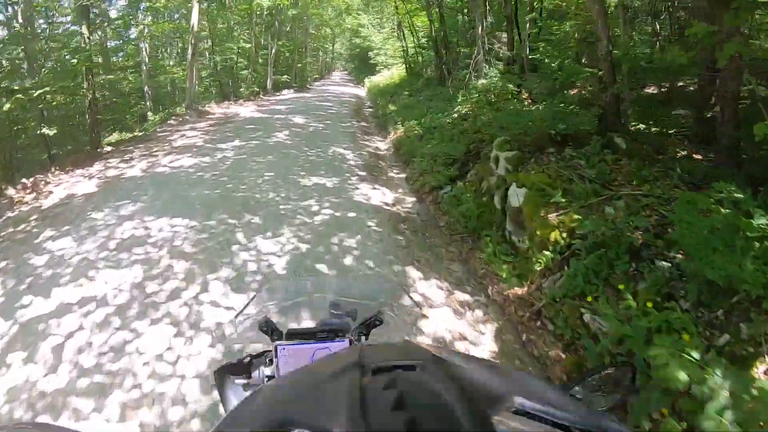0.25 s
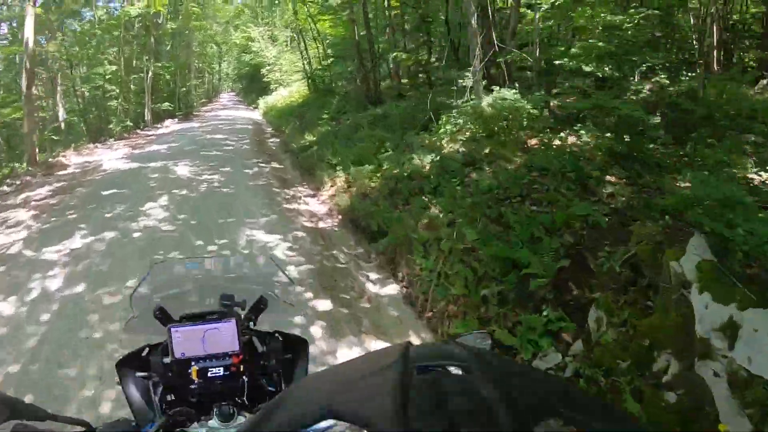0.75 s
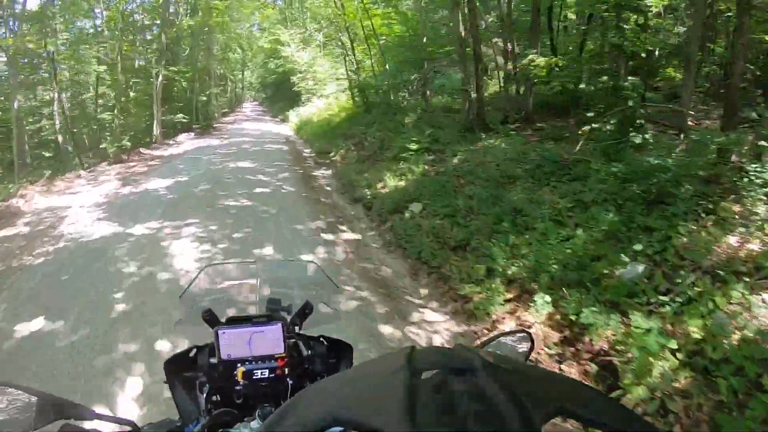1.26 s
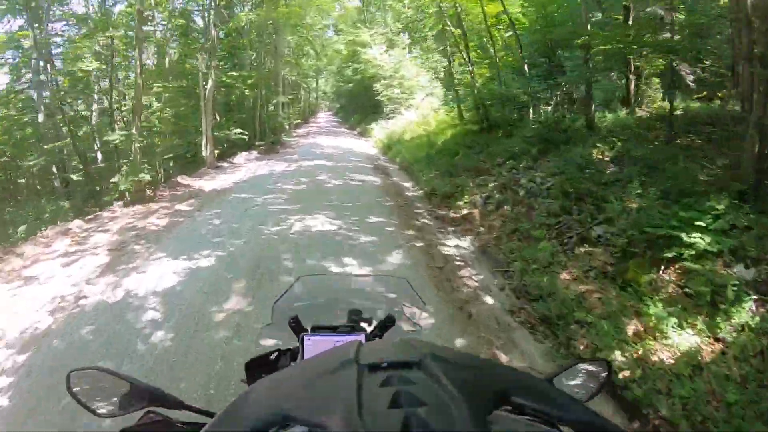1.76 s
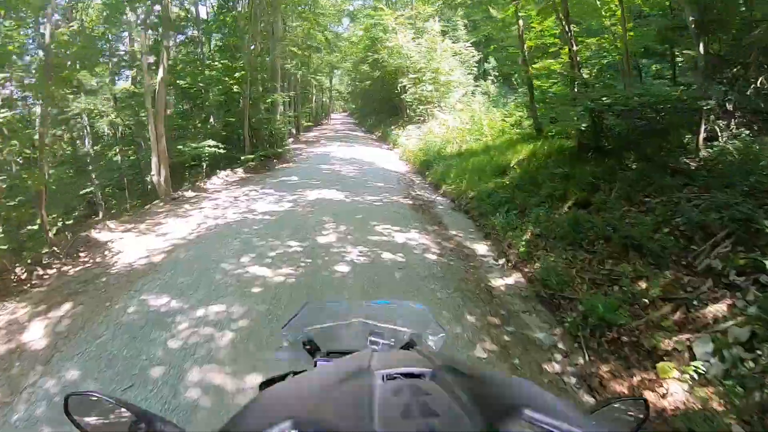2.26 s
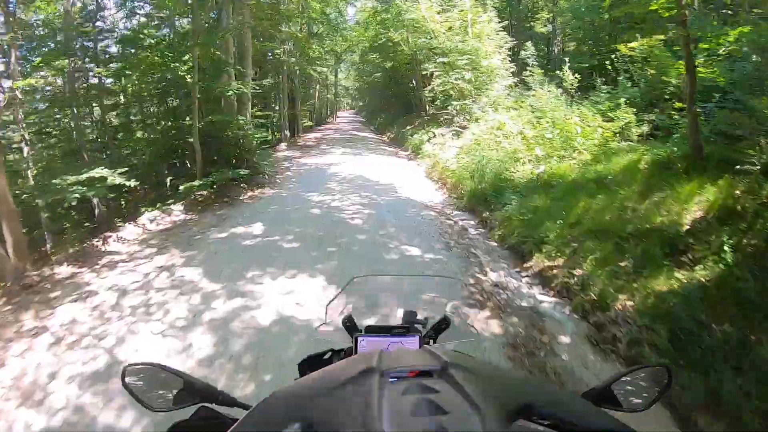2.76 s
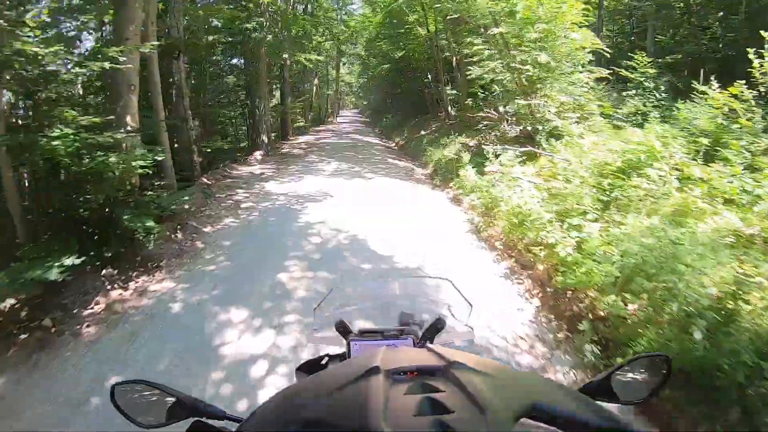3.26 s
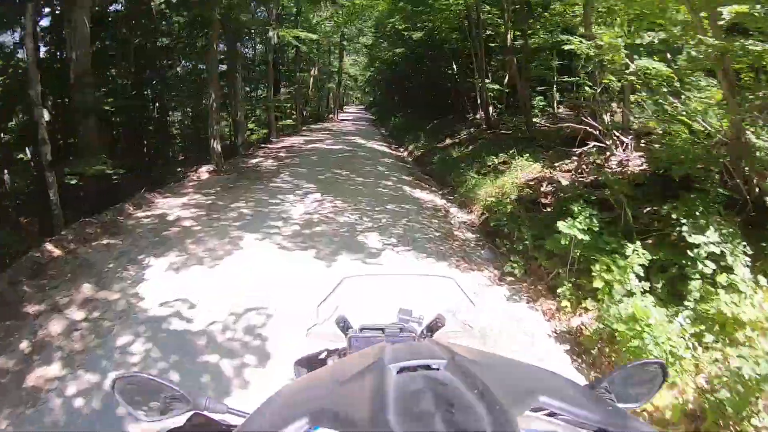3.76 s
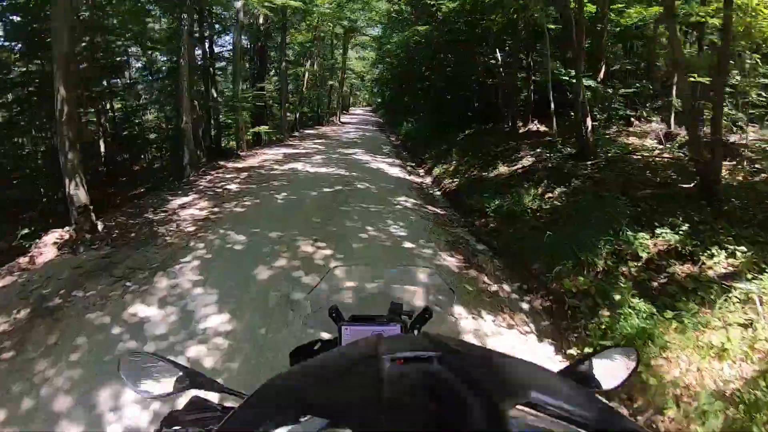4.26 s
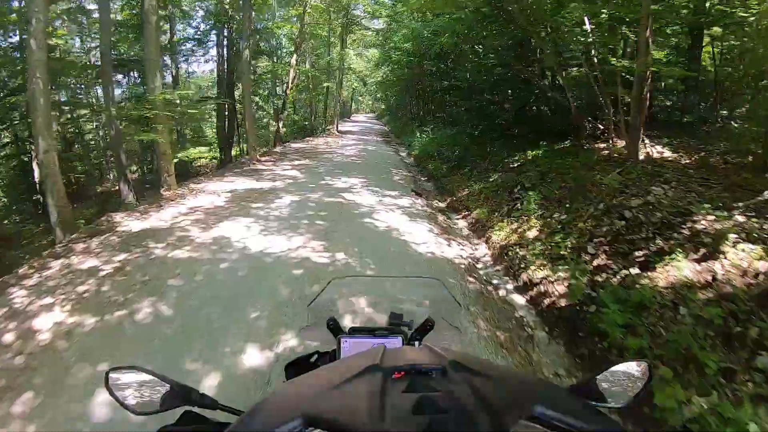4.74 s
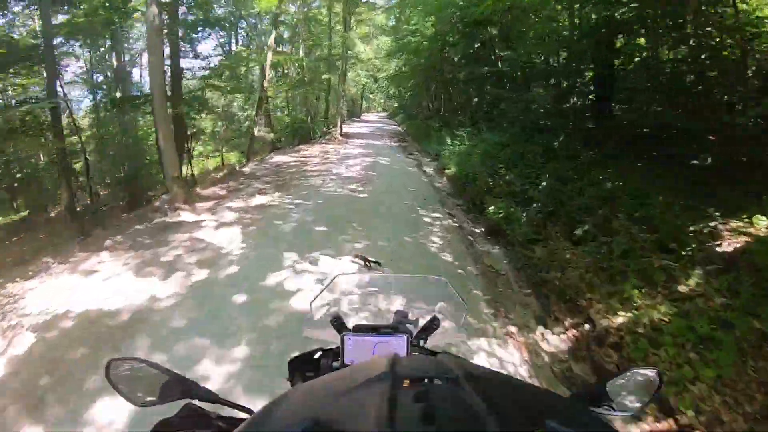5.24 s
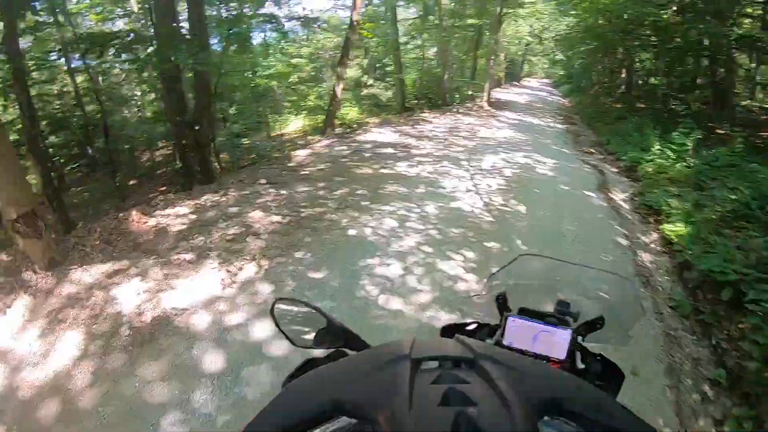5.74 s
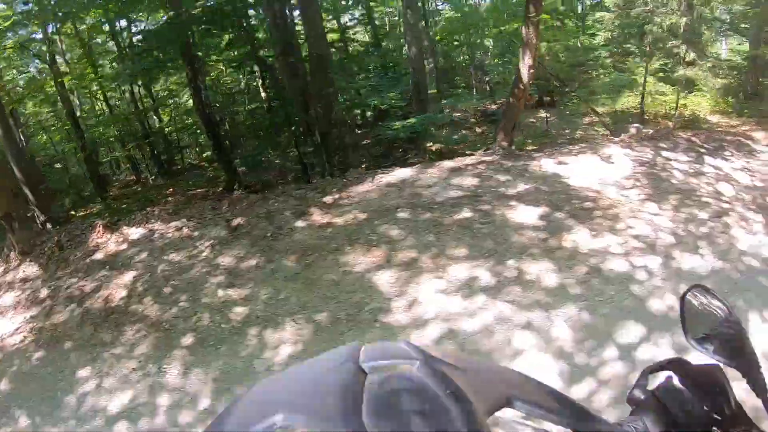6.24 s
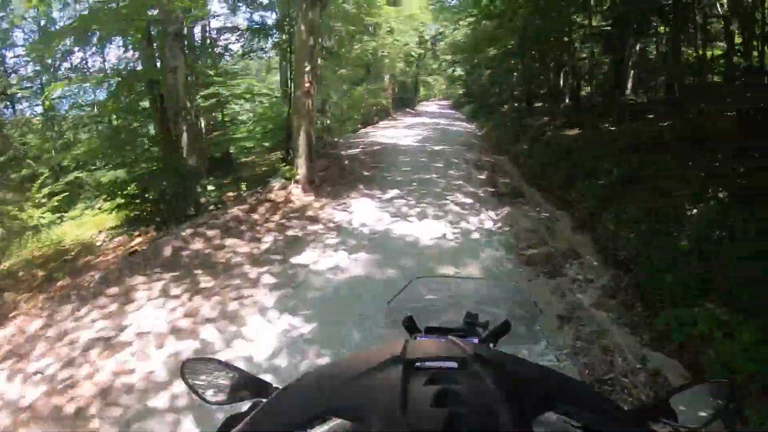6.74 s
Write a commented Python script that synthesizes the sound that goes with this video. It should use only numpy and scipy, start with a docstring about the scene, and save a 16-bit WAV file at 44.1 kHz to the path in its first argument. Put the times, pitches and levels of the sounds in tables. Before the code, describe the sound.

Low throbbing motorcycle engine with hissing tyres under gusting, popping wind noise, strongest mid-ride, with sharp little stone knocks and a brief lull near the end.

```python
"""A motorcycle engine drones throughout, under gusting wind, heard at a microphone port on a helmet.
Its twin-cylinder exhaust is a sum of firing orders; valve gear and tyres hiss in step with the firings.
The airstream is coloured noise: rumble, gusts, flares, with bursts for pops and crackle.
Air whistles are short gliding sines; thrown stones knock on the frame as damped modes with a crack.
Faint high-band noise bursts are scattered from 3.4 to 5.65 s."""
import sys
import numpy as np
from scipy import signal
from scipy.fft import rfft, irfft, next_fast_len
from scipy.io import wavfile
from scipy.ndimage import map_coordinates

SR = 44100
rng = np.random.default_rng(int(sys.argv[2]) if len(sys.argv) > 2 else 0)


def pcm_store(signal):
    """Save signal as 16-bit PCM."""
    levels = np.round(np.clip(np.atleast_2d(signal), -1, 1) * 32767)
    wavfile.write(sys.argv[1], SR, levels.astype(np.int16).T)


N = 308700  # 7 s

# airstream on the port: t/s, rumble/dB, gust body/dB, bright edge/dB
WIND_LEVELS = [(0, -14, -23, -36.5), (.25, -28.5, -28, -37), (.55, -18.5, -26.5, -37),
               (.66, -25, -23.5, -36), (.76, -27, -29.5, -37), (1.03, -21, -29.5, -41),
               (1.48, -19.5, -27, -43.5), (1.72, -14, -25.5, -44.5), (2, -20, -36, -54),
               (2.25, -24.5, -38, -50.5), (2.63, -20, -29.5, -47), (2.76, -25, -24.5, -40.5),
               (2.88, -17.5, -19, -42), (2.97, -20, -26, -34.5), (3.1, -15.5, -22, -39),
               (3.2, -20.5, -28.5, -49), (3.33, -23.5, -28, -37), (3.59, -19.5, -23.5, -33),
               (3.9, -22.5, -26.5, -41.5), (4.1, -17.5, -25.5, -31), (4.2, -22, -23.5, -36),
               (4.3, -17.5, -19, -29), (4.45, -15, -20.5, -29.5), (4.6, -15, -24, -32),
               (4.8, -18.5, -20.5, -34), (5.05, -15, -21, -34.5), (5.19, -23, -24.5, -38),
               (5.3, -15.5, -22, -31.5), (5.7, -18, -25.5, -41), (5.85, -14.5, -27, -36),
               (5.96, -22, -33.5, -38), (6.08, -26, -50.5, -52), (6.3, -25.5, -44, -47),
               (6.62, -26, -36.5, -49), (6.76, -21, -29, -40), (7, -18, -18.5, -33.5)]
# rumble colour: f/Hz, density/dB
RUMBLE_COLOUR = [(6, -30), (14, -8), (25, 0), (50, 0), (75, 0), (115, -5), (160, -18), (300, -42),
                 (600, -120)]
# gust body colour: f/Hz, density/dB
BODY_COLOUR = [(30, -84.5), (60, 0.5), (130, 10), (200, 6), (400, 0), (600, -2.5), (1200, -16.5),
               (2500, -100.5), (5000, -110)]
# bright edge colour: f/Hz, density/dB
EDGE_COLOUR = [(200, -86), (400, 6), (900, 4.5), (1500, 1), (2500, -11), (3800, -15), (4600, -23.5),
               (5600, -35), (7500, -34), (9000, -76), (11000, -110)]
# edge flares where the air shears fastest: t/s, crack peak/dB, noise level/dB, decay/s
EDGE_FLARES = [(0.637, -32, -30, 0.018), (.656, -26, -26.5, 0.021), (1.319, -27, -28, 0.014),
               (1.475, -24.5, -34, .011), (1.665, -27, -23, .006), (1.679, -24, -30, .008),
               (1.697, -35, -26, .012), (1.775, -29, -33, 0.0094), (1.96, -38, -27.5, 0.014),
               (2.617, -38, -23, 0.014), (2.864, -22, -25, 0.02), (2.893, -28, -34, 0.0093),
               (3.069, -25, -30, .011), (3.426, -31, -30, .012), (3.444, -38, -27, .012),
               (3.547, -22, -19, 0.02), (3.608, -20, -28, 0.025), (3.955, -38, -23, 0.013),
               (4.106, -16, -24.5, 0.041), (4.25, -21, -25.5, 0.039), (4.37, -32, -22.5, 0.023),
               (4.567, -30, -18, 0.012), (4.724, -32, -44, 0.0082), (4.896, -33, -27, 0.013),
               (5.104, -26, -32, .008), (5.136, -40, -22, 0.0086), (5.223, -26, -22.5, 0.013),
               (5.301, -39, -19.5, 0.011), (5.507, -26, -20.5, 0.031), (5.762, -30, -36, 0.008),
               (5.815, -38, -26.5, 0.016), (5.857, -28, -33, 0.024), (5.88, -24, -25.5, 0.015),
               (5.909, -26, -30, 0.016), (5.938, -27, -32, 0.019), (5.963, -25, -39, 0.019),
               (6.165, -33, -28, 0.0073), (6.717, -36, -25.5, 0.03), (6.909, -21, -20.5, 0.018)]
# loudest pops of air on the port: t/s, flutter peak/dB, thump peak/dB, flutter pitch/Hz
LOUD_POPS = [(0.654, -13.5, -25, 256), (1.305, -21, -14, 304), (1.621, -15, -15, 296),
             (1.667, -14, -11, 297), (1.68, -10, -25, 250), (1.698, -10.5, -16, 299),
             (1.778, -12, -13, 363), (1.833, -19, -10.5, 310), (1.961, -23, -24, 361),
             (2.022, -11, -16, 325), (2.62, -20, -14.5, 307), (2.807, -20, -16, 433),
             (2.851, -14.5, -12, 334), (3.079, -11, -16, 375), (3.139, -14, -15, 280),
             (3.427, -14.5, -16, 458), (3.452, -23, -20, 544), (3.536, -17.5, -10, 339),
             (3.594, -15, -12, 388), (3.622, -12, -15, 371), (4.054, -19.5, -13, 397),
             (4.116, -10.5, -14, 398), (4.188, -18.5, -20, 576), (4.243, -10, -22, 250),
             (4.319, -16, -23, 398), (4.349, -7.5, -16, 250), (4.385, -15.5, -28, 624),
             (4.413, -7.5, -14, 331), (4.446, -19, -27, 377), (4.476, -16, -16, 380),
             (4.514, -18, -13, 482), (4.575, -12, -12, 280), (4.611, -12, -15, 275), (4.651, -14, -12, 350),
             (4.683, -11, -16, 250), (4.707, -10, -16, 299), (4.72, -11, -13, 360), (4.77, -15, -12, 420),
             (4.832, -15, -13.5, 468), (4.866, -19, -22, 557), (4.881, -10, -20, 339),
             (4.913, -17, -24, 501), (4.976, -14, -21, 296), (5.141, -9, -11, 249),
             (5.218, -11.5, -13.5, 250), (5.247, -12.5, -18, 256), (5.289, -12, -16, 320),
             (5.311, -16, -16, 705), (5.388, -20, -25, 546), (5.484, -11.5, -12, 490),
             (5.51, -15, -21, 510), (5.647, -22, -20, 684), (5.758, -21.5, -21, 417),
             (5.813, -21, -15, 262), (6.168, -19, -22, 295), (6.485, -22, -18.5, 250),
             (6.779, -13, -17, 286), (6.84, -14, -12, 256), (6.916, -5.5, -16, 261), (6.959, -19, -18, 293)]
# whistles of air over an edge: t/s, length/s, start f/Hz, end f/Hz, level/dB
AIR_WHISTLES = [(0.114, 0.023, 1700, 1650, -34), (0.46, .022, 1680, 1660, -36),
                (0.59, 0.016, 1690, 1680, -31), (5.868, 0.04, 600, 900, -33), (5.9, 0.045, 950, 1300, -28),
                (5.912, 0.026, 1600, 1780, -30), (5.925, .032, 1950, 2250, -35),
                (5.91, 0.05, 2450, 3050, -38), (5.92, .04, 3200, 3800, -40), (5.955, .03, 1650, 1400, -37),
                (6.108, .035, 3100, 3000, -45), (3.178, 0.028, 880, 1080, -31), (6, .045, 2230, 1760, -40),
                (6.173, 0.014, 2250, 2050, -35), (6.185, 0.014, 2150, 2000, -36),
                (6.214, .024, 2150, 2020, -39), (6.23, 0.034, 2230, 2000, -37)]
# stones on the frame: t/s, level/dB, ring f/Hz
STONE_KNOCKS = [(1.669, -19, 1330), (1.698, -24.5, 1090), (1.781, -16, 980), (1.755, -33, 1310),
                (1.835, -23, 780), (2.808, -22, 1150), (2.869, -19.5, 1560), (3.085, -19, 1080),
                (3.425, -26, 915), (3.596, -21, 786), (4.189, -30, 740), (4.612, -24, 890),
                (4.868, -25, 754), (4.913, -31, 800), (5.221, -27, 880), (5.389, -27, 795),
                (5.65, -19.5, 764), (5.815, -26, 1000), (6.171, -25, 860), (6.173, -27, 1380),
                (6.188, -32, 1330), (6.488, -20, 1370), (6.51, -23, 634), (6.841, -18.5, 605),
                (6.913, -17, 1130)]
# engine: t/s, firing rate/Hz, first order/dB, higher orders/dB, load/dB
ENGINE_STATE = [(0, 43, -25, -24, 2), (.25, 45, -21, -23, 3), (.5, 48.5, -19, -21, 3),
                (1.1, 53.7, -20, -19, 1), (1.4, 56.8, -21, -20, 1), (1.62, 45.5, -20, -23, -2),
                (2, 40.6, -23, -25, -2), (2.3, 41.8, -21.5, -22, 0), (2.7, 43.8, -22, -22, 0),
                (3.2, 46, -26, -27, 0), (3.8, 47.8, -26, -26, -2), (4.3, 49.3, -26, -26, -3),
                (4.7, 48, -26, -25, -3), (5.3, 49, -27, -26, -3), (5.7, 47, -24, -23, -4),
                (6.1, 46.4, -21, -21.5, -5), (6.6, 45.1, -22, -22, -6), (7, 44, -22, -24, -5)]
# exhaust colour of the orders above the first: f/Hz, gain/dB
EXHAUST_COLOUR = [(80, -1), (108, -1), (125, -8), (150, -12), (168, -18), (205, -18), (232, -16),
                  (256, -14), (280, -18), (297, -24), (350, -34), (600, -38), (900, -52)]
# running hiss of valve gear and tyres on gravel: t/s, level/dB
HISS_LEVEL = [(0, -34.5), (.7, -33.5), (1.3, -35), (1.99, -41), (2.61, -36.5), (3.1, -37), (3.35, -38.5),
              (3.57, -34), (3.8, -39), (4.33, -34), (4.82, -39.5), (5.6, -41), (5.8, -41.5), (5.93, -34),
              (6.05, -41), (6.57, -39), (6.78, -36), (7, -37.5)]
# running hiss colour: f/Hz, density/dB
HISS_COLOUR = [(100, -94), (180, -33), (270, 8.5), (350, -2), (450, 0), (600, 1.5), (800, -9), (1100, -3),
               (1500, -8), (2500, -8), (3800, -11), (4500, -17), (5500, -22.5), (7300, -30), (8300, -37.5),
               (10300, -43.5), (11500, -39), (15000, -70)]
# metal parts ringing in the hiss: f/Hz, width/Hz, gain at zero load/dB, gain per load/(dB/dB)
METAL_RINGS = [(602, 70, -2.5, .5), (1068, 48, -1.5, -1), (1667, 59, 3, 2.4), (2390, 100, -2, 1.1),
               (3090, 53, -1.5, 0), (3603, 180, 1, 1.5)]
# microphone's treble fall: f/Hz, gain/dB
MICROPHONE_RESPONSE = [(9000, 0), (10500, -2), (12000, -10), (14900, -30)]

TOP_HZ = 14900
FLARE_RISE_S = 0.004
# one sideways gust, as the head turns, also hisses in the treble
SHEAR_S, SHEAR_PEAK_DB = (5.865, 5.908, 5.925, 5.945, 5.97), -38
FLUTTER_SPAN = 1.9  # band reaches this factor below and above the pitch
POP_EDGE_DB = -18  # re flutter peak
SMALL_POPS, SMALL_POP_HZ = 160, 472  # count, median pitch
SMALL_POP_DB, SMALL_SPREAD_DB = -7.5, 3.5  # peak re gust body, scatter
CRACKLE_GRAINS, CRACKLE_DB = 900, 1  # count, peak re bright edge
HIGH_BURSTS, HIGH_SPAN_S = 55, (3.4, 5.65)  # count, time span
HIGH_PEAK_DB, HIGH_SPREAD_DB = -56, 2.5  # mean peak, scatter
KNOCK_RISE_S, KNOCK_T60_S = 0.0006, 0.013
KNOCK_UPPER_RATIO, KNOCK_UPPER_DB = 1.332, -8.5  # second mode re first
KNOCK_CRACK_DB = -9  # contact crack, re knock level
HALF_ORDER_DB = -12  # cylinders differ: orders halfway between whole ones
# a gear whines as the engine climbs to its fastest
WHINE_ORDER, WHINE_DB, WHINE_SPAN_S = 27, -47, (.8, 1.42)


def amp(db):
    """Decibels to gain."""
    return 10 ** (np.asarray(db) / 20)


def unit(x):
    """Scaled to rms 1."""
    return x / np.sqrt(np.mean(x ** 2) + 1e-20)


def along(points, hz):
    """(f/Hz, value) points read on a log axis."""
    f, v = np.transpose(points)
    return np.interp(np.log(hz + 1), np.log(f + 1), v)


def curves(rows):
    """One value per sample for each column after the time."""
    s, *cols = np.transpose(rows)
    return [np.interp(np.arange(N) / SR, s, c) for c in cols]


def wobble(rate_hz):
    """Smooth random curve, rate_hz knots a second."""
    knots = rng.standard_normal(int(N * rate_hz / SR) + 4)
    return map_coordinates(knots, [np.arange(N) * rate_hz / SR])


def filtered(x, response):
    """x through a response given as a function of frequency."""
    m = next_fast_len(N + 8192)
    return irfft(rfft(x, m) * response(np.fft.rfftfreq(m, 1 / SR)), m)[..., :N]


def noise(colour):
    """Noise of rms 1 with an (f/Hz, density/dB) colour."""
    return unit(filtered(rng.standard_normal(N), lambda hz: amp(along(colour, hz))))


def bursts(times_s, peaks_db, lo_hz, hi_hz, rise_s, t60_s, order=3):
    """One short band of noise per time, with the given peak."""
    out, t = np.zeros(N + SR), np.arange(SR // 16) / SR
    band = signal.butter(order, [lo_hz, hi_hz], "bandpass", fs=SR, output="sos")
    shape = (1 - np.exp(-t / rise_s)) * amp(-60 * t / t60_s)
    puffs = signal.sosfilt(band, shape * rng.standard_normal((len(times_s), len(t))))
    for s, db, puff in zip(times_s, peaks_db, puffs):
        out[round(s * SR):][:len(t)] += amp(db) * puff / np.abs(puff).max()
    return out[:N]


def high_bursts():
    """Faint high-band noise bursts at random times within their span."""
    s = rng.uniform(*HIGH_SPAN_S, size=HIGH_BURSTS)
    peak_db = HIGH_PEAK_DB + HIGH_SPREAD_DB * rng.standard_normal(size=HIGH_BURSTS)
    return bursts(s, peak_db, 5800, 10400, rise_s=.002, t60_s=0.046)


def wind():
    """Eddies come in lumps, deeper in a strong gust; body and edge share some of them."""
    rumble_db, body_db, edge_db = curves(WIND_LEVELS)
    depth = np.clip((body_db + 36.5) / 12, .3, 1.2)
    lumps = (.7 * wobble(30) + 1.1 * wobble(90)) * depth
    rumble = unit(amp(2 * wobble(9)) * noise(RUMBLE_COLOUR))
    body = unit(amp(2.8 * lumps + 1.8 * wobble(80)) * noise(BODY_COLOUR))
    edge = unit(amp(1.1 * lumps + .6 * wobble(60)) * noise(EDGE_COLOUR))
    return amp(rumble_db) * rumble + amp(body_db) * body + amp(edge_db + 1.4 * wobble(22)) * edge


def crackle():
    """Dense short grains, as of grit, that follow the bright edge's level."""
    s = rng.uniform(0, N / SR, size=CRACKLE_GRAINS)
    edge_db = curves(WIND_LEVELS)[2][(s * SR).astype(int)]
    return bursts(s, edge_db + CRACKLE_DB, 420, 2600, rise_s=0.00049, t60_s=0.012)


def flares():
    """Fast shear brightens the air: a crack, edge noise that rises and decays, and a treble hiss."""
    gain, t = np.zeros(N + SR), np.arange(SR // 4) / SR
    for s, _, db, decay_s in EDGE_FLARES:
        shape = (1 - np.exp(-t / FLARE_RISE_S)) * np.exp(-t / max(decay_s, .002))
        gain[round(s * SR):][:len(t)] += amp(db) * shape
    flare = gain[:N] * noise(EDGE_COLOUR)
    shear_db = [SHEAR_PEAK_DB] * len(SHEAR_S)
    shear = bursts(SHEAR_S, shear_db, 1800, 5800, rise_s=0.0054, t60_s=0.072)
    s, crack_db = np.transpose(EDGE_FLARES)[:2]
    crack = bursts(s, crack_db, 670, 3630, rise_s=0.0023, t60_s=0.02, order=5)
    return shear + flare + crack


def pops():
    """Air hits the port: thump, brief flutter, sharper edge; lesser pops fall at random, level with the gusts."""
    small_s = rng.uniform(0, N / SR, size=SMALL_POPS)
    scatter = rng.standard_normal(size=(SMALL_POPS, 3))
    body_db = curves(WIND_LEVELS)[1][(small_s * SR).astype(int), None]
    small_db = body_db + SMALL_POP_DB + SMALL_SPREAD_DB * scatter[:, :2]  # flutter, thump
    small_hz = SMALL_POP_HZ * np.exp(0.24 * scatter[:, 2])
    small = np.column_stack([small_s, small_db, small_hz])
    s, flutter_db, thump_db, pitch_hz = np.vstack([LOUD_POPS, small]).T
    flutter = sum(bursts([at], [db], hz / FLUTTER_SPAN, hz * FLUTTER_SPAN, rise_s=0.0007, t60_s=0.02)
                  for at, db, hz in zip(s, flutter_db, pitch_hz))
    edge = bursts(s, flutter_db + POP_EDGE_DB, 1000, 3300, rise_s=0.0015, t60_s=0.045, order=4)
    thump = bursts(s, thump_db, 74, 288, rise_s=0.001, t60_s=0.026)
    return flutter + edge + thump


def whistles():
    """Breathy gliding tones: the pitch flutters and the level breaks up."""
    out, rough, flutter = np.zeros(N), wobble(250), wobble(440)
    for s, length_s, start_hz, end_hz, db in AIR_WHISTLES:
        u, at = np.linspace(0, 1, int(length_s * SR)), round(s * SR)
        span = slice(at, at + len(u))
        glide_hz = start_hz + (end_hz - start_hz) * u
        pitch_hz = glide_hz * (1 + .055 * flutter[span])
        tone = np.sin(2 * np.pi * np.cumsum(pitch_hz) / SR) * (1 + .6 * rough[span])
        out[span] += amp(db) * np.sin(np.pi * u) * tone
    return out


def knocks():
    """A stone's contact cracks and excites two quickly damped modes of the frame."""
    out, t = np.zeros(N + SR), np.arange(SR // 20) / SR
    shape = (1 - np.exp(-t / KNOCK_RISE_S)) * amp(-60 * t / KNOCK_T60_S)
    phases = rng.uniform(0, 2 * np.pi, size=len(STONE_KNOCKS))
    for (s, db, hz), phase in zip(STONE_KNOCKS, phases):
        lower = np.sin(2 * np.pi * hz * t)
        upper = amp(KNOCK_UPPER_DB) * np.sin(2 * np.pi * KNOCK_UPPER_RATIO * hz * t + phase)
        out[round(s * SR):][:len(t)] += amp(db) * shape / shape.max() * (lower + upper)
    s, db, _ = np.transpose(STONE_KNOCKS)
    crack = bursts(s, db + KNOCK_CRACK_DB, 1400, 3900, rise_s=.001, t60_s=.014, order=5)
    return out[:N] + crack


def running_hiss(turn, load_db):
    """Valve gear and tyres: noise and ringing metal, swelling with every firing."""
    gate = 1 + .15 * np.cos(turn + .4 * wobble(9)) + .1 * np.cos(2 * turn + .6 * wobble(9))
    rattle = noise(HISS_COLOUR)
    metal = np.zeros(N)
    for centre, width, db, db_per_load in METAL_RINGS:
        # resonant band-pass, gain 1 at its centre
        ring = filtered(rattle, lambda f: 1j * f * width / (centre ** 2 - f * f + 1j * f * width))
        metal += amp(db + db_per_load * load_db + 2.4 * wobble(26)) * ring
    hiss = noise(HISS_COLOUR) * amp(0.22 * wobble(27))
    return amp(curves(HISS_LEVEL)[0]) * unit(gate) * (hiss + metal)


def gear_whine(turn):
    """A gear's tone, locked to a high multiple of the firing rate."""
    start_s, end_s = WHINE_SPAN_S
    fade = np.interp(np.arange(N) / SR, [start_s - .2, start_s, end_s, end_s + .05], [0, 1, 1, 0])
    return fade * amp(WHINE_DB + 2 * wobble(15)) * np.sin(WHINE_ORDER * turn + .5 * wobble(30))


def engine():
    """Firing orders coloured by the exhaust, with gear whine and running hiss on the same phase."""
    rate_hz, first_db, upper_db, load_db = curves(ENGINE_STATE)
    rate_hz = rate_hz * (1 + .004 * wobble(5))
    turn = 2 * np.pi * np.cumsum(rate_hz) / SR  # one cycle per firing
    drone = amp(first_db + 1.3 * wobble(8)) * np.sin(turn)
    for order in np.arange(3, 32) / 2:
        # uneven burning: every order wavers on its own; load makes the upper ones bark
        level_db = upper_db + along(EXHAUST_COLOUR, order * rate_hz)
        level_db += load_db * (order > 2.5) + HALF_ORDER_DB * (order % 1 > 0)
        level_db += 1.9 * wobble(6) + 1.2 * wobble(28)
        jitter = .07 * wobble(9) + .03 * wobble(30)
        drone += amp(level_db) * np.sin(order * turn - .6 * order + order * jitter)
    drone += gear_whine(turn)
    # exhaust pulses reach the port as suctions; sqrt(2): levels are rms
    return -np.sqrt(2) * drone + running_hiss(turn, load_db)


def scene():
    """Everything sums at one port."""
    air = wind() + crackle() + flares() + pops() + whistles()
    return (high_bursts() + air + knocks() + engine())[None]


def record(dry):
    """Soft squeeze of the loudest swings, microphone treble fall, band limit."""
    squeezed = dry / (1 + np.abs(dry / .7) ** 3) ** (1 / 3)
    return filtered(squeezed, lambda hz: amp(along(MICROPHONE_RESPONSE, hz)) * (hz < TOP_HZ))


dry = scene()
out = record(dry)
pcm_store(out)
```